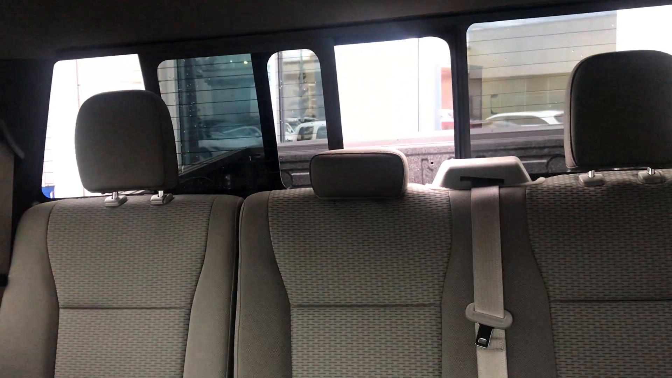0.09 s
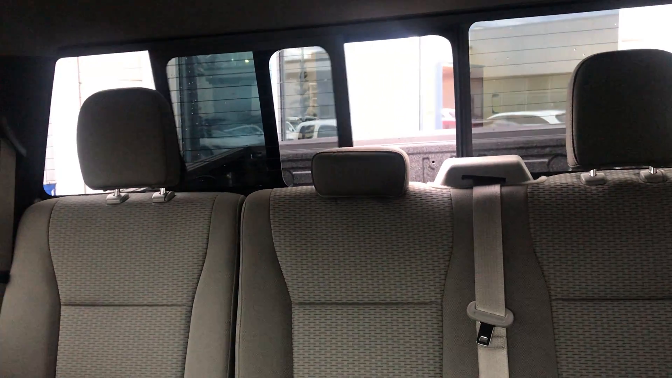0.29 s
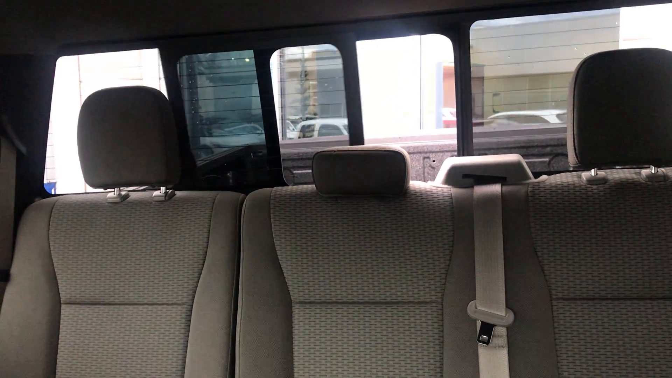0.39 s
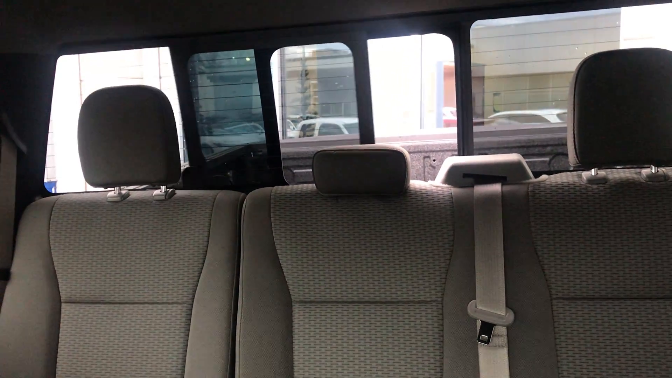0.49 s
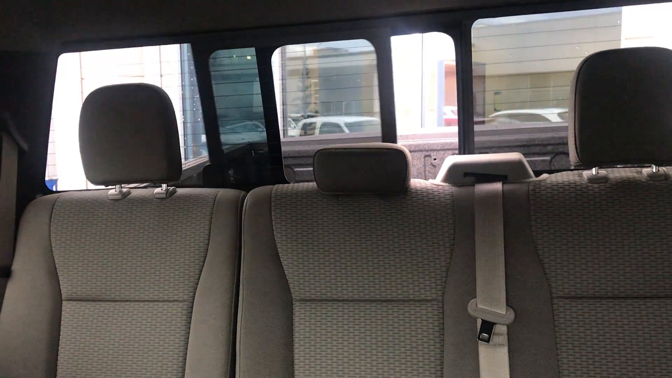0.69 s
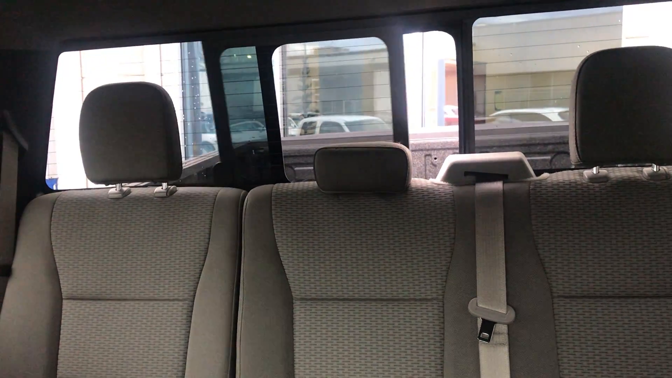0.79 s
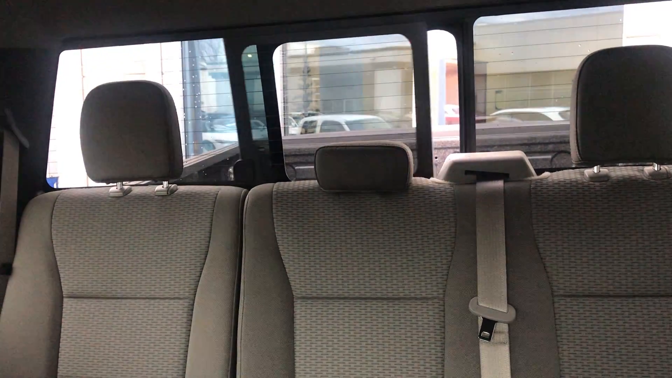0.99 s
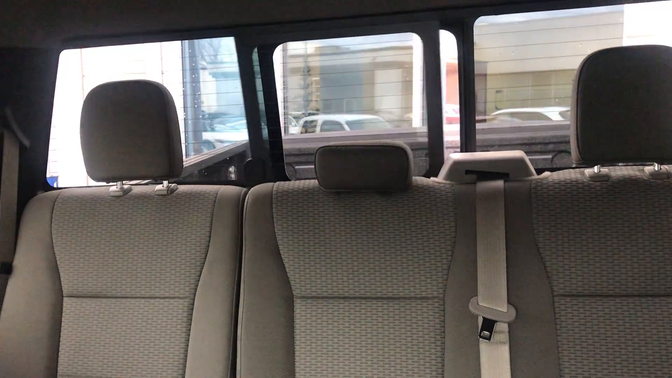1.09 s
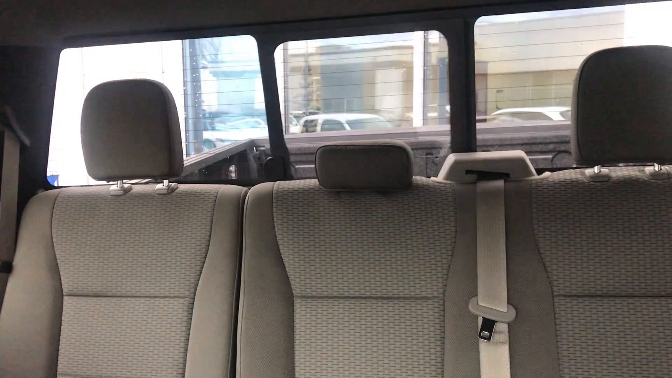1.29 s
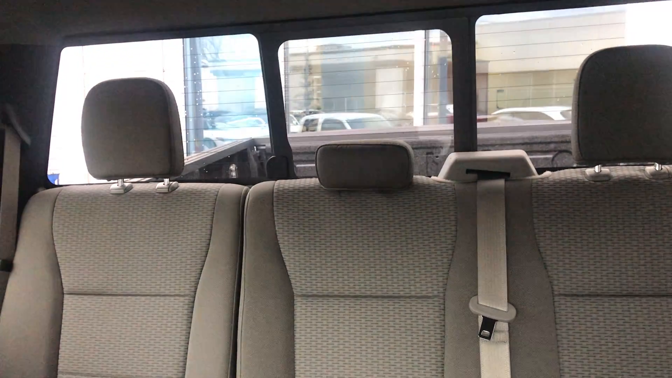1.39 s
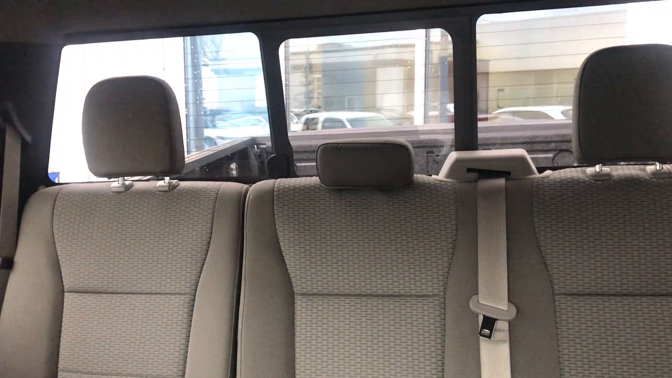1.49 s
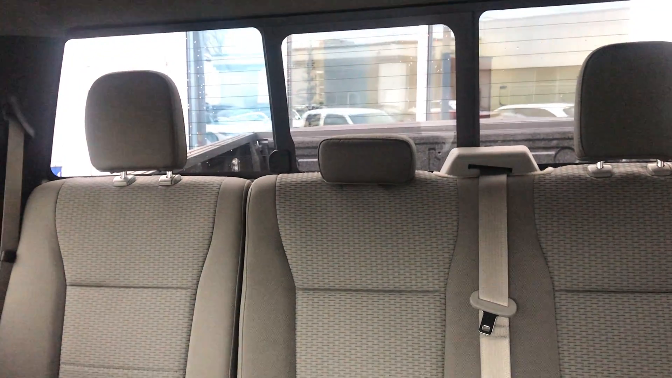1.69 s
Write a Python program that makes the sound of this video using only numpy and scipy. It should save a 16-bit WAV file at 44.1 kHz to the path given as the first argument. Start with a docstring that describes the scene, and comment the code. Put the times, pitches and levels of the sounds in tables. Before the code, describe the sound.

Electric sliding window knocks loose, hums and hisses along its felt track, then clacks shut.

```python
"""Powered truck window closing

A truck's sliding rear window closes under power, heard by a microphone at the front of the quiet cabin.
The drive takes up its slack in knocks over a faint cable rub; the pane breaks free and coloured noise
hisses along its felt channel over the motor's sine partials. It brushes the seal and stops at the frame
with clacks of noise and ringing modes, and thuds that boom in the cabin as low decaying modes."""
import sys
import numpy as np
from scipy import signal
from scipy.fft import rfft, irfft
from scipy.io import wavfile
from scipy.ndimage import uniform_filter1d

SR = 44100
rng = np.random.default_rng(int(sys.argv[2]) if len(sys.argv) > 2 else 0)


def digitize_waveform(pressure):
    """Quantize a signal to 16-bit integers and store it at the path in sys.argv[1].

    Rows of a 2-D input are taken as channels; values are limited to [-1, 1].
    """
    field = np.atleast_2d(pressure).T
    bounded = np.clip(field, -1, 1)
    quanta = np.round(bounded * 32767).astype(np.int16)
    wavfile.write(sys.argv[1], SR, quanta)


N = 77175  # samples, 1.75 s
T = np.arange(N) / SR
START_S, STOP_S = 0.2903, 1.4025  # the pane moves between these times
RISE_S, STALL_S = 0.0086, 0.0082  # linear start, time constant of the stall


def undb(db):
    """Decibels to gain."""
    return 10 ** (np.asarray(db) / 20)


def unit(x):
    """Scale to rms 1."""
    return x / np.sqrt(np.mean(x ** 2))


def curve(table, column):
    """One column of a table, joined by straight lines in time."""
    rows = np.array(table)
    return np.interp(T, rows[:, 0], rows[:, column])


def colour(x, points, muffle_hz=None):
    """Give a sound a spectrum of (f/Hz, level/dB) points, steep outside them, and perhaps muffle it."""
    f = np.maximum(np.fft.rfftfreq(N, 1 / SR), 1)
    hz, db = np.array(points).T
    gain = undb(np.interp(np.log(f), np.log(hz), db))
    gain = gain * np.minimum(1, f / hz[0]) ** 4 * np.minimum(1, hz[-1] / f) ** 4
    if muffle_hz:
        gain = gain / np.hypot(1, (f / muffle_hz) ** 3)
    return unit(irfft(rfft(x) * gain, N))


def noise(points, muffle_hz=None):
    """Coloured noise of rms 1."""
    return colour(rng.standard_normal(N), points, muffle_hz)


def walk(rate):
    """Smooth random wander with a spread near 1, from `rate` random values a second."""
    k = int(SR / rate)
    steps = np.repeat(rng.standard_normal(N // k + 1), k)
    return unit(uniform_filter1d(steps, k)[:N])


def fade(start, t60):
    """Sudden start and exponential decay by 60 dB in t60 seconds."""
    return (T >= start) * np.exp(-np.log(1000) * np.maximum(T - start, 0) / t60)


def swell(centre, width):
    """A smooth Gaussian rise and fall about one moment."""
    return np.exp(-.5 * ((T - centre) / width) ** 2)


def ring(modes, start, stretch=1):
    """Modes struck at one moment, each a decaying cosine."""
    out = 0
    for hz, db, t60 in modes:
        out = out + undb(db) * fade(start, t60 * stretch) * np.cos(2 * np.pi * hz * (T - start))
    return out


def reflect(x, t60, db):
    """Add dense reflections: convolution with decaying noise of unit energy."""
    echoes = rng.standard_normal(N) * fade(0, t60)
    return x + undb(db) * signal.fftconvolve(x, echoes / np.linalg.norm(echoes))[:N]


def started():
    """0 before the pane moves, 1 after its quick start."""
    return np.clip((T - START_S) / RISE_S, 0, 1)


def moving():
    """1 while the pane travels, with a quick start and stall."""
    return started() * np.exp(-np.maximum(T - STOP_S, 0) / STALL_S)


def cabin():
    """Low steady rumble and a faint hiss, both stationary coloured noise."""
    # spectrum of the low background: f/Hz, relative level/dB
    rumble_points = [(28, -11), (52, 1), (80, -4), (110, -0.5), (150, -10), (210, -5), (250, -14.5),
                     (290, -13.5), (340, -20), (410, -21), (580, -27), (800, -36), (1000, -32),
                     (1300, -43.5)]
    # spectrum of the hiss: f/Hz, relative level/dB
    hiss_points = [(300, -7), (1000, 13), (2000, 1), (4000, -2.5), (9000, -8), (15000, -7.5)]
    rumble_db, hiss_db = -50.5, -71.5
    return undb(rumble_db) * noise(rumble_points) + undb(hiss_db) * noise(hiss_points)


def cable_slack():
    """Faint rub of the cable before the pane moves: coloured noise that gives way as it starts."""
    # spectrum of the cable rub: f/Hz, relative level/dB
    rub_points = [(500, 1), (800, 5), (2000, 1), (3400, 1), (4700, -2.5), (5200, -9), (6600, -7.5),
                  (7500, -19), (15000, -25)]
    level_db = -68
    return undb(level_db) * noise(rub_points) * (1 - started())


def knocks():
    """Pane and drive knock: a bright tick and a dull clack of noise, a short modal ring, a cabin tail."""
    # knocks: t/s, clack and ring gain/dB, tick gain/dB, decay time factor, muffled above f/Hz
    hits = [(0.209, -49.5, -53, 0.99, 1410), (0.253, -56.5, -54.5, 1.56, 6200),
            (0.285, -48, -42, 2.3, 4970), (0.298, -47.5, -47, 0.73, 6000), (0.314, -58, -44.5, 0.82, 7000),
            (0.370, -53.5, -41.5, 1.17, 1000), (0.397, -52.5, -42, 1.04, 1050),
            (1.389, -34, -32.5, 0.84, 12000), (1.395, -26, -47, 0.69, 5000), (1.431, -59, -46, 1.07, 2280)]
    # spectra of dull clack and bright tick: f/Hz, relative level/dB
    clack_points = [(190, -4), (270, -8), (350, 9), (450, 3.5), (580, 4.5), (720, -13.5), (950, -8.5),
                    (1500, -3), (1900, -11.5), (2300, -21), (3500, -42), (8000, -48), (15000, -60)]
    tick_points = [(300, 10), (1000, -1.5), (1600, 2), (2700, 5), (4000, 1.5), (6000, -6), (9000, -7.5),
                   (15000, -16)]
    # modes of pane and frame: f/Hz, relative level/dB, t60/s before the decay time factor
    frame_modes = [(295, -9.5, 0.21), (402.7, -3, 0.084), (483.5, -20, 0.17), (530, -16, 0.073),
                   (622, -27, 0.12), (1240, -16, 0.027), (1400, -16, 0.033), (1642, -6, 0.036),
                   (2250, -9, 0.03), (2700, -9, 0.03)]
    clack_t60_s, tick_t60_s = 0.071, 0.049  # before the decay time factor
    contact_s = 0.0011  # rise time
    tail_t60_s, tail_db = 0.2, -20  # short reverberation of the cabin
    out = 0
    for start, clack_db, tick_db, stretch, muffle_hz in hits:
        clack = noise(clack_points, muffle_hz) * fade(start, clack_t60_s * stretch)
        audible_modes = [mode for mode in frame_modes if mode[0] < muffle_hz]
        body = clack + ring(audible_modes, start, stretch)
        tick = noise(tick_points, muffle_hz) * fade(start, tick_t60_s * stretch)
        contact = np.clip((T - start) / contact_s, 0, 1)
        out = out + (undb(clack_db) * body + undb(tick_db) * tick) * contact
    return reflect(out, tail_t60_s, tail_db)


def wall_shudder():
    """The rear wall shudders as the pane gets under way: one low sine that swells and dies."""
    centre_s, width_s, hz, peak_db = 0.33, 0.065, 61.85, -40
    return undb(peak_db) * swell(centre_s, width_s) * np.sin(2 * np.pi * hz * T)


def thumps():
    """Shoves on the rear wall boom in the cabin: low modes softened by the length of the push."""
    # heavy shoves: t/s, gain/dB, length of the push/s, extra gain of the upper modes/dB
    shoves = [(0.219, -39.5, .003, 3), (0.288, -36.5, 0.0042, 10), (0.3162, -30, 0.0023, 0.5),
              (1.391, -35.5, 0.00193, 5.5), (1.411, -24.5, 0.0035, -3), (1.457, -37, 0.0039, 1.5),
              (1.474, -45, 0.0036, 2)]
    # boom of rear wall and cabin, lowest mode first: f/Hz, relative level/dB, t60/s
    boom_modes = [(102, 4, 0.088), (164, 2.5, 0.111), (215, -19, 0.053)]
    out = 0
    for start, db, push_s, upper_db in shoves:
        push = np.sin(np.pi * np.minimum(T / push_s, 1)) ** 2
        boom = ring(boom_modes[:1], start) + undb(upper_db) * ring(boom_modes[1:], start)
        out = out + undb(db) * signal.fftconvolve(boom, push / push.sum())[:N]
    return out


def motor():
    """A hum of sine partials follows the motor's wavering speed, over the noise rumble of the cable drive."""
    # motor: t/s, speed f/Hz, fundamental level/dB, octave level/dB
    course = [(0.3, 94, -56, -53), (0.4, 100.6, -41, -50), (0.45, 89, -68, -61),
              (0.52, 87.14, -43.5, -47.5), (0.61, 88.22, -44.5, -66), (0.65, 91.8, -64, -57),
              (0.68, 98.6, -45, -46), (0.77, 103, -52, -56), (0.86, 102, -43.5, -58.5),
              (0.95, 99.8, -53.5, -51.5), (1.01, 105, -42.5, -64), (1.09, 108.6, -45.5, -57.5),
              (1.2, 106.7, -43, -57.5), (1.3, 107.3, -42, -55.5), (1.39, 111.7, -42.5, -58)]
    # other motor partials: multiple of the speed, level/dB
    partials = [(0.5, -56.5), (2.75, -64.5), (3, -67.5), (4, -69.5), (5, -76), (7, -72)]
    # spectrum of the cable drive's rumble: f/Hz, relative level/dB
    drive_points = [(42, -17), (54, 0), (72, 2), (105, -4), (140, 3.5), (200, 0), (250, -11), (300, -21),
                    (360, -12.5), (410, -13), (1000, -25.5)]
    drive_db = -54
    wobble = 0.01105  # spread of the speed, as a fraction
    flutter_db = 0.68  # spread of the fundamental's level; the others flutter twice as much
    speed_hz = curve(course, column=1) * (1 + wobble * walk(40.3))
    phase = 2 * np.pi * np.cumsum(speed_hz) / SR
    hum = undb(curve(course, column=2) + flutter_db * walk(30.1)) * np.sin(phase)
    hum = hum + undb(curve(course, column=3) + 2 * flutter_db * walk(45.2)) * np.sin(2 * phase)
    for multiple, db in partials:
        level = undb(db + 2 * flutter_db * walk(26.2))
        hum = hum + level * np.sin(multiple * phase + rng.uniform(0, 2 * np.pi))
    # the root of 2 makes the partials' levels rms
    return (np.sqrt(2) * hum + undb(drive_db) * noise(drive_points)) * moving()


def slide():
    """Glass rubs on felt: hiss and tiny random slips in three wandering bands, with channel resonances."""
    # spectrum of the rub: f/Hz, relative level/dB
    felt_points = [(250, 7), (450, -2), (600, 3), (760, -0.5), (1100, 0.5), (1500, 2.5), (1950, 2.5),
                   (2400, 2.5), (3200, 3.5), (3650, 1.5), (4300, 2.5), (4750, -2), (5200, 0), (6000, -4),
                   (8500, -9), (9800, -9), (10500, -12), (11500, -9), (12800, -8.5), (15500, -13.5)]
    # band gains of the rub: t/s, below 2.6 kHz level/dB, 2.6-6 kHz level/dB, treble level/dB
    band_levels = [(0.3, -56.5, -53.5, -52), (0.45, -55, -53, -53), (0.66, -55.5, -53, -51.5),
                   (0.74, -51, -51, -50), (0.87, -52.5, -53.5, -53.5), (0.93, -52, -51.5, -52.5),
                   (1.02, -52, -54, -53.5), (1.16, -51.5, -52.5, -53), (1.28, -52.5, -51.5, -51),
                   (1.35, -51.5, -51.5, -47.5), (1.39, -48.5, -48.5, -53.5)]
    # channel resonances that swell as the pane passes:
    # t/s, Gaussian half length/s, f/Hz, full width at half amplitude/Hz, level/dB
    resonances = [(0.547, 0.057, 1336, 300, -61), (0.822, 0.19, 3180, 150, -61.5),
                  (0.80, 0.054, 4250, 450, -62), (0.937, 0.014, 2270, 200, -53), (0.982, .2, 4020, 60, -73),
                  (1.262, 0.038, 1580, 300, -57.5), (1.35, .04, 2850, 350.6, -58)]
    slips_per_s, slip_share, flicker_db = 700, 0.41, 1.0
    reflect_t60_s, reflect_db = 0.13, -9.5  # reflections off the glass and roof
    slips = unit((rng.random(N) < slips_per_s / SR) * rng.standard_normal(N))
    friction = reflect(rng.standard_normal(N) + slip_share * slips, reflect_t60_s, reflect_db)
    rub = rfft(colour(friction, felt_points))
    f = np.fft.rfftfreq(N, 1 / SR)
    band = np.searchsorted([2600, 6000], f)
    out = 0
    for k in range(len(band_levels[0]) - 1):
        level_db = curve(band_levels, column=k + 1) + flicker_db * walk(59.9)
        out = out + irfft(rub * (band == k), N) * undb(level_db)
    for centre, length, hz, width, db in resonances:
        response = 1 / (1 + (2 * (f - hz) / width) ** 2)
        resonance = unit(irfft(rfft(rng.standard_normal(N)) * response, N))
        out = out + undb(db) * resonance * swell(centre, length)
    return out * moving()


def seal():
    """The leading edge brushes the seal in a swish of noise; after the stop the seal rustles as it settles."""
    # spectrum of the seal: f/Hz, relative level/dB
    seal_points = [(1200, -1), (2500, 1), (3700, 5), (6000, -7), (9500, -1), (11000, -14), (15000, -12)]
    brush_s, brush_width_s, brush_db = 1.348, 0.005, -43
    settle_t60_s, settle_db = 0.42, -70.5
    brush = undb(brush_db) * noise(seal_points) * swell(brush_s, brush_width_s)
    settle = undb(settle_db) * noise(seal_points) * fade(STOP_S, settle_t60_s)
    return brush + settle


def scene():
    """All the sources at one microphone."""
    cabin_and_knocks = cabin() + cable_slack() + knocks()
    return (cabin_and_knocks + wall_shudder() + thumps() + motor() + slide() + seal())[None]


def record(dry):
    """The recorder cuts the top above 15.8 kHz with a steep elliptic low-pass."""
    return signal.sosfilt(signal.ellip(10, .2, 70, 15800, fs=SR, output="sos"), dry)


dry = scene()
out = record(dry)
digitize_waveform(out)
```